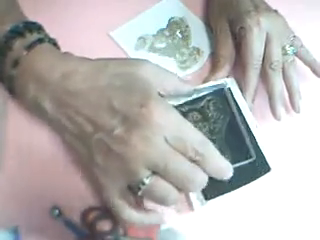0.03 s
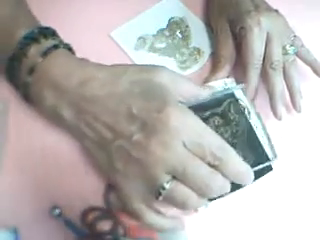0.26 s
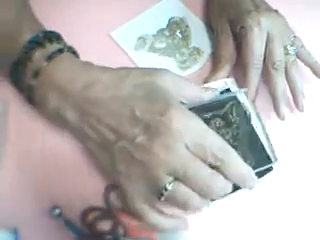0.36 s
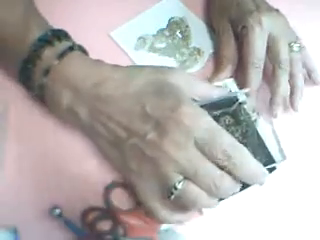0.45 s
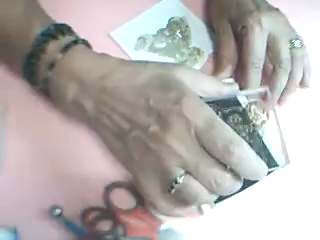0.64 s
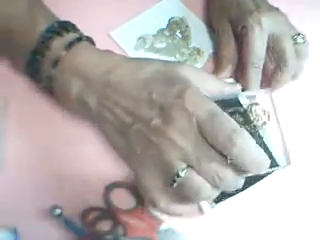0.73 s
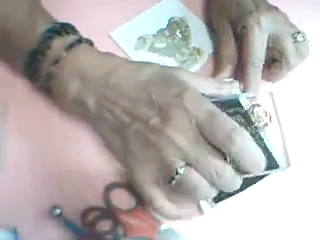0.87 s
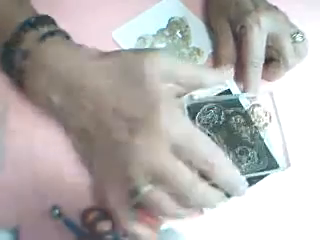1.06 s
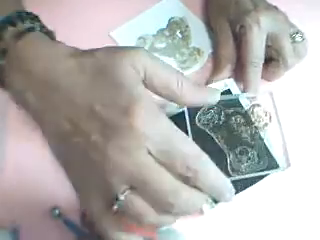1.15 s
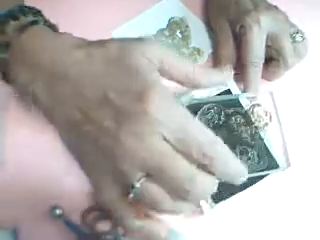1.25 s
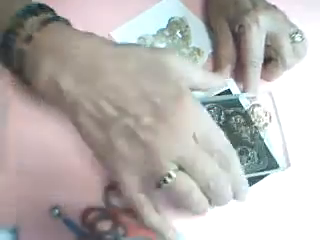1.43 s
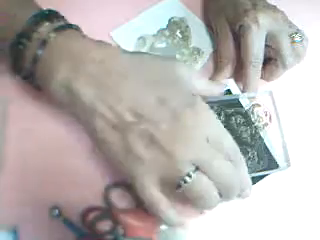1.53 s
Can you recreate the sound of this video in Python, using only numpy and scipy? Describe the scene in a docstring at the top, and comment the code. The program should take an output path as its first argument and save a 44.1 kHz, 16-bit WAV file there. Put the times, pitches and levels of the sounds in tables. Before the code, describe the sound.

A stamp block taps a plastic ink pad case on a hollow desk, softly first, then a hard double knock with bracelet rattle, then fading small bumps; close small microphone, low room hum.

```python
"""Hollow desk, close to a small microphone: a stamp block is pressed and tapped on an ink pad in a plastic case.
Taps boom through desk and case modes; noise bursts clack in the case, with short single-pitch ticks.
Bracelet beads rattle (dense clicks into bead modes) and one small metal ring pings.
Behind: room noise, treble hiss, a wavering motor hum, a gliding mid whine and a faint high whistle."""
import sys
import numpy as np
from scipy import signal
from scipy.fft import rfft, irfft
from scipy.io import wavfile

SR = 44100
rng = np.random.default_rng(int(sys.argv[2]) if len(sys.argv) > 2 else 0)


def transcribe(u):
    """Save the signal u as a 16-bit wav file named by the first command-line argument.

    u: samples, shape (n,) or (channels, n), limited to [-1, 1]; the rate is SR.
    q: integer samples, one column per channel.
    """
    v = np.clip(np.atleast_2d(u).T, -1, 1)
    q = np.round(v * 32767).astype(np.int16)
    wavfile.write(sys.argv[1], SR, q)


def invert_db(level):
    """Linear amplitude ratio for a level in decibels (20 dB per decade), elementwise."""
    return 10 ** (np.asarray(level, dtype=float) / 20)


N = 70560


def evened(x):
    """Scales to rms 1."""
    return x / np.sqrt(np.mean(abs(x) ** 2) + 1e-20)


def curve(table, col=1):
    """Interpolates one column of a table over time, per sample."""
    table = np.array(table)
    return np.interp(np.arange(N) / SR, table[:, 0], table[:, col])


def add(mix, start_s, sound):
    """Adds a sound in place, cut at the end of the mix."""
    part = mix[round(start_s * SR):][:len(sound)]
    part += sound[:len(part)]


def read(points, hz):
    """Interpolates a spectrum in dB over log frequency."""
    f, value = np.transpose(points)
    return np.interp(np.log(hz), np.log(f), value)


def coloured(db_of_hz, size):
    """Noise with the given spectrum shape, rms 1."""
    spectrum = rfft(rng.standard_normal(size))
    hz = np.fft.rfftfreq(size, 1 / SR) + 1
    return evened(irfft(spectrum * invert_db(db_of_hz(hz)), size))


def slow_noise(width_hz):
    """Complex one-pole noise of the given bandwidth, rms 1."""
    r = np.exp(-np.pi * width_hz / SR)
    white = rng.standard_normal((N + SR, 2)) @ [1, 1j]
    return evened(signal.lfilter([1], [1, -r], white)[SR:])  # first second: filter settling


def ring(hz, db, t60_s, t):
    """Decaying sine of one mode."""
    return invert_db(db - 60 * t / t60_s) * np.sin(2 * np.pi * hz * t)


def phase(table):
    """Imaginary phase of a tone gliding along the pitch column."""
    return 2j * np.pi * np.cumsum(curve(table)) / SR


def room_noise():
    """Steady noise with a fixed spectrum."""
    # room noise spectrum: pitch_hz, relative_level_db (per Hz)
    floor = [(20, -23), (35, 0), (60, -12), (110, -6.5), (140, -5.5), (200, -14.5), (330, -18), (600, -21),
             (1000, -19.5), (1300, -27), (3000, -33), (9000, -43.5), (12400, -42.5), (14000, -72)]
    return invert_db(-53) * coloured(lambda hz: read(floor, hz), N)


def hiss():
    """Faint treble hiss: bands of slow noise shifted up to their centres."""
    # hiss level: time_s, level_db
    hiss_level = [(0, -95), (.5, -64), (.68, -63.5), (.9, -61), (1.1, -64), (1.25, -75), (1.6, -97)]
    # hiss bands: centre_hz, width_hz, relative_level_db
    hiss_bands = [(4730, 140, -12), (5070, 1500, -4.5), (5920, 53, -10)]
    t, out = np.arange(N) / SR, np.zeros(N)
    for hz, width_hz, db in hiss_bands:
        out += invert_db(db) * (slow_noise(width_hz) * np.exp(2j * np.pi * hz * t)).real
    return invert_db(curve(hiss_level)) * out


def motor_hum():
    """Harmonics of a wavering pitch, each a steady part plus slow noise wider at higher orders."""
    # motor pitch: time_s, pitch_hz, level_db
    motor = [(0, 157.3, -59.5), (.2, 159, -66), (.9, 161, -53), (1.06, 160.5, -62), (1.14, 159.4, -56),
             (1.25, 167.9, -53.5), (1.4, 167.2, -53.5), (1.46, 170.8, -66), (1.51, 170, -51),
             (1.6, 168.6, -61.5)]
    # motor harmonics: multiple, relative_level_db
    orders = [(1, 8.5), (2, -8)]
    width_hz, steady = 9.1, 0.72  # steady: amplitude share
    turn, out = phase(motor), np.zeros(N)
    for k, db in orders:
        waver = steady + (1 - steady) * slow_noise(width_hz * k)
        out += invert_db(db) * (waver * np.exp(k * turn)).real
    return invert_db(curve(motor, col=2)) * out


def whine():
    """Fuzzy mid tone: narrow noise carried on a gliding pitch."""
    # whine: time_s, pitch_hz, level_db
    whine_path = [(0, 950, -73), (1.2, 987, -70.5), (1.4, 997.3, -72), (1.5, 1078, -63), (1.6, 1108, -63)]
    tone = (slow_noise(20) * np.exp(phase(whine_path))).real
    return invert_db(curve(whine_path, col=2)) * tone


def whistle():
    """Brief gliding high tone, roughened by noise and silent outside its table."""
    # whistle: time_s, pitch_hz, level_db
    whistle_path = [(.87, 9400, -83), (.9, 9700, -70), (.93, 9860, -76), (.96, 9930, -70), (.99, 9730, -74),
                    (1.03, 9460, -77), (1.06, 9400, -82), (1.08, 8700, -70), (1.12, 8350, -74),
                    (1.14, 8195, -90)]
    t = np.arange(N) / SR
    tone = ((1 + 0.6 * slow_noise(90)) * np.exp(phase(whistle_path))).real
    sounding = (t > whistle_path[0][0]) & (t < whistle_path[-1][0])
    return invert_db(curve(whistle_path, col=2)) * tone * sounding


def background():
    """Sum of the sounds behind the desk."""
    return room_noise() + hiss() + motor_hum() + whine() + whistle()


def room(x):
    """Diffuse tail: decaying noise that swells over its first 30 ms."""
    tail_db, t60_s = -15.5, 0.35
    t = np.arange(SR // 2) / SR
    tail = rng.standard_normal(len(t)) * invert_db(-60 * t / t60_s) * np.minimum(t / 0.03, 1)
    return invert_db(tail_db) * signal.fftconvolve(x, tail / np.linalg.norm(tail))[:N]


def metal_ring():
    """A small metal ring pings: one decaying mode with a soft start."""
    start_s, level_db, pitch_hz, rise_s, t60_s = 0.534, -38, 8000, 0.006, 0.12
    t, out = np.arange(SR // 2) / SR, np.zeros(N)
    add(out, start_s, np.minimum(t / rise_s, 1) * ring(pitch_hz, level_db, t60_s, t))
    return out


def beads():
    """Dense small clicks, each ringing one bead mode, under a sudden start, a hold and a fade."""
    # bead rattles: start_s, level_db, hold_s, t60_s
    rattles = [(0.223, -70, 0.0062, .1), (.253, -44, 0.028, 0.14), (0.425, -64.5, 0.011, .15),
               (.535, -49, 0.011, 0.16), (0.568, -48.5, 0.022, 0.19), (0.761, -65, 0.019, 0.07)]
    # bead modes: pitch_hz, relative_level_db, t60_s
    bead_modes = [(2920, -1.5, 0.018), (4540, -3, 0.015), (5200, -2, 0.0064), (5970, -9, .012),
                  (6460, -8.5, 0.024), (7490, -3, .04), (8580, 1.5, 0.022), (8985, -2.5, 0.023),
                  (9470, -9, 0.024), (9730, -6, 0.023), (10440, -13, .02), (11250, -10, 0.018),
                  (12100, -30, .02)]
    clicks_per_s, spread_db, rise_s = 2100, 2.5, 0.00079  # click rate is per mode
    t, level = np.arange(SR // 2) / SR, np.zeros(N)
    for start_s, db, hold_s, t60_s in rattles:
        fade = invert_db(db - 60 * np.maximum(t - hold_s, 0) / t60_s)
        add(level, start_s, np.minimum(t / rise_s, 1) * fade)
    hit = rng.random((len(bead_modes), N)) < clicks_per_s / SR
    strength = invert_db(spread_db * np.minimum(rng.exponential(1, hit.shape), 3))
    clicks = hit * strength * rng.choice([-1, 1], hit.shape)
    rings = np.array([ring(*mode, t[:3000]) for mode in bead_modes])
    # equal energy per mode, then its level
    rings *= invert_db(np.array(bead_modes)[:, 1:2]) / np.linalg.norm(rings, axis=1, keepdims=True)
    rung = signal.fftconvolve(level * evened(clicks), rings, axes=1)[:, :N]
    return rung.sum(0) / np.linalg.norm(rings)


def ticks():
    """Edges of plastic touch: a few cycles of one pitch."""
    # ticks: start_s, level_db, pitch_hz
    tick_list = [(.2225, -34, 950), (0.321, -35, 4300), (.389, -33, 1110), (.8155, -33, 990)]
    t, out = np.arange(2000) / SR, np.zeros(N)
    for start_s, db, hz in tick_list:
        add(out, start_s, ring(hz, db, 13 / hz, t))  # 60 dB down in 13 periods
    return out


def clacks():
    """Wide noise bursts stand for the many short upper modes of the hard plastic case."""
    # clacks: start_s, level_db, rise_s, t60_s, tilt_db_per_octave
    clack_list = [(.098, -52.5, 0.0083, 0.049, -4.5), (.222, -33.5, 0.0032, 0.11, -4.5),
                  (0.229, -39, 0.013, 0.082, 0), (0.3202, -44.5, 0.00081, 0.15, 2.5),
                  (.389, -26, 0.0014, 0.05, -8), (.398, -38.5, 0.0032, 0.082, 0),
                  (0.408, -45.5, 0.0034, 0.16, 2), (.5205, -20.5, 0.0037, 0.12, -1),
                  (.57, -46, 0.0036, 0.11, 5), (.64, -48.5, 0.0049, 0.18, 1.5),
                  (.8155, -46, 0.0012, 0.063, -3), (1.02, -56.5, 0.0038, 0.14, 3)]
    # clack spectrum: pitch_hz, relative_level_db (per Hz)
    clack_spectrum = [(400, -7), (700, -0.5), (1000, -4.5), (1400, -10), (2000, -13), (3100, -19.5),
                      (5000, -26), (8000, -32), (10500, -39.5), (12400, -62)]
    t, out = np.arange(SR // 3) / SR, np.zeros(N)
    for start_s, db, rise_s, t60_s, tilt in clack_list:
        def tilted(hz):
            return read(clack_spectrum, hz) + tilt * np.log2(np.clip(hz, 600, 12000) / 1000)
        fade = invert_db(db - 60 * np.maximum(t - rise_s, 0) / t60_s)
        add(out, start_s, np.minimum(t / rise_s, 1) * fade * coloured(tilted, len(t)))
    return out


def taps():
    """A soft push of the contact time rings the modes of desk and case, alternating in sign."""
    # taps: start_s, level_db, contact_ms, bass_db (first desk mode and sway), pair_db (next two modes)
    tap_list = [(.004, -44, 2.7, 6, 4), (0.02, -43.5, 4.2, 7.5, 6), (.211, -37.5, 2.7, 8, 9.5),
                (0.2209, -25.5, 0.7, 7.5, 4), (0.242, -22.5, 1.87, -25, 0), (0.252, -35, 3.9, 2, 11),
                (0.31, -33, 5.1, 0, 23), (0.3179, -19.5, 1.36, -2, 7), (.327, -22, 2.1, -14, 0.5),
                (0.353, -49, 2.9, -20, -13), (0.39, -25.5, 0.7, 10, 6), (.409, -25.5, 1.2, -8, -4),
                (0.432, -50.5, 2.8, 18, 3), (0.5189, -10.5, 0.98, -10, -8), (.525, -8, 1.12, -6.5, 5.5),
                (0.5324, -23, 2, 9, -7.5), (0.542, -7.5, 1.36, -7.5, -28), (0.57, -33, 1.5, 10, 3),
                (.63, -23.5, 1.62, -1.5, 8.5), (.653, -39.5, 1.73, 14, 17), (.708, -37.5, 2.02, 2, 4),
                (.718, -35, 2.06, -18, 9), (.728, -40, 0.89, 5, -16), (0.763, -49, 3.7, 13, 3.5),
                (0.833, -50, 3.8, 18.5, 12), (.851, -33.5, 1.78, 4.5, 7), (0.901, -58.5, 1.5, 8.5, 3)]
    # desk and case modes: pitch_hz, relative_level_db, t60_s
    desk_modes = [(96, 4.5, 0.1), (205, -1.5, 0.055), (246, 0, 0.083), (286, 3, 0.047), (366, 1.5, 0.075),
                  (476, -8.5, 0.081), (517, -15, 0.14), (418, -7.5, 0.057), (594.4, -14, 0.11),
                  (655, -24, 0.13), (760.4, -14.5, 0.075), (840, -19.5, 0.17), (982, -12, 0.087),
                  (1130, -25, 0.14), (1337, -15, 0.034)]
    sway = (61.6, -1, 0.17)  # deepest mode, same columns
    rise_cycles = 0.5  # time constant of each mode's swell, in periods
    t, out = np.arange(SR // 2) / SR, np.zeros(N)
    modes = []
    for k, (hz, db, t60_s) in enumerate(desk_modes + [sway]):
        swell = 1 - np.exp(-t * hz / rise_cycles)
        modes.append((-1) ** k * ring(hz, db, t60_s, t) * swell)
    for start_s, db, contact_ms, bass_db, pair_db in tap_list:
        u = np.arange(220) / SR * 1000 / contact_ms
        push = np.sin(np.pi * np.minimum(u, 1)) ** 2
        share = invert_db([bass_db, pair_db, pair_db] + [0] * (len(desk_modes) - 3) + [bass_db])
        add(out, start_s, invert_db(db) * np.convolve(share @ np.array(modes), push / push.sum()))
    return out


def scene():
    """Sounds at the desk, their room tail and the background; one channel."""
    near = metal_ring() + beads() + ticks() + clacks() + taps()
    return (background() + near + room(near))[None]


def roll_off(x):
    """The treble ends steeply here."""
    return signal.sosfilt(signal.butter(12, 12520, fs=SR, output="sos"), x)


def record(dry):
    """The microphone drops the deepest bass and the top and adds a small constant offset."""
    low_hz, stop_hz, offset = 52, 13300, 0.0055
    heard = signal.sosfilt(signal.butter(2, low_hz, "high", fs=SR, output="sos"), dry)
    heard = signal.sosfilt(signal.cheby2(10, 45, stop_hz, fs=SR, output="sos"), heard)
    return roll_off(heard + offset)


dry = scene()
out = record(dry)
transcribe(out)
```